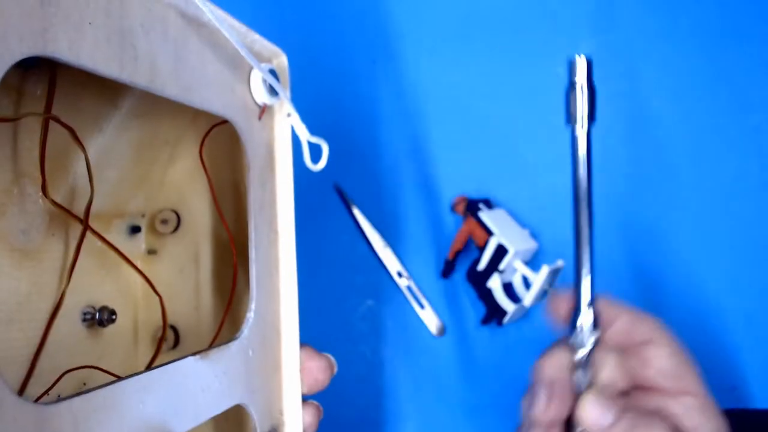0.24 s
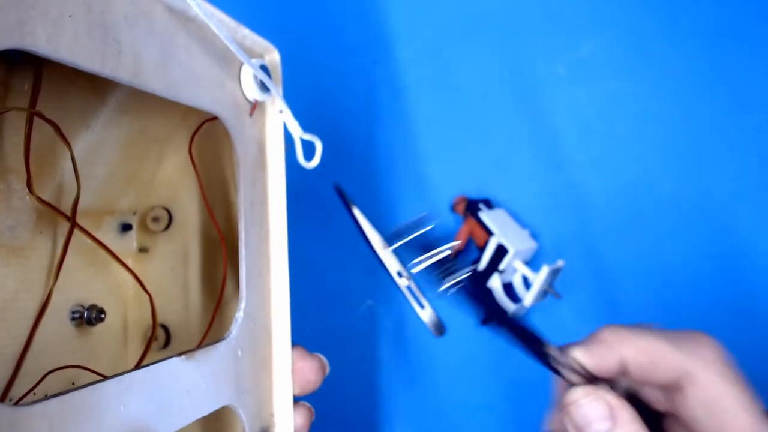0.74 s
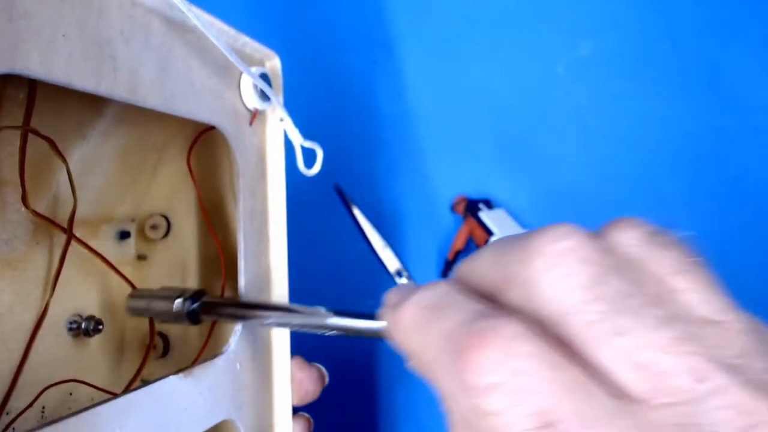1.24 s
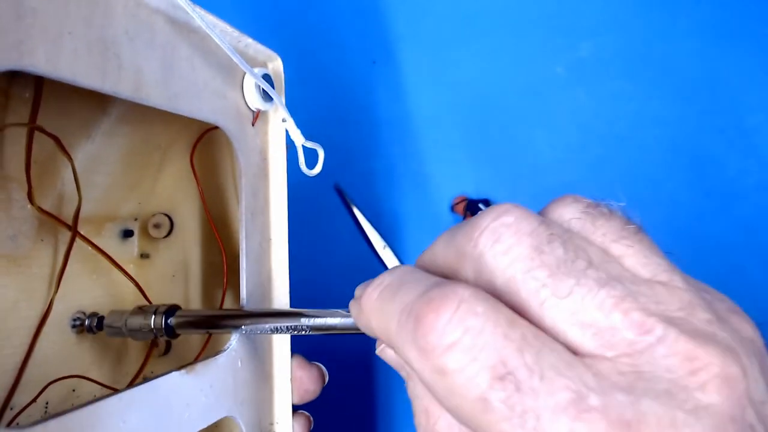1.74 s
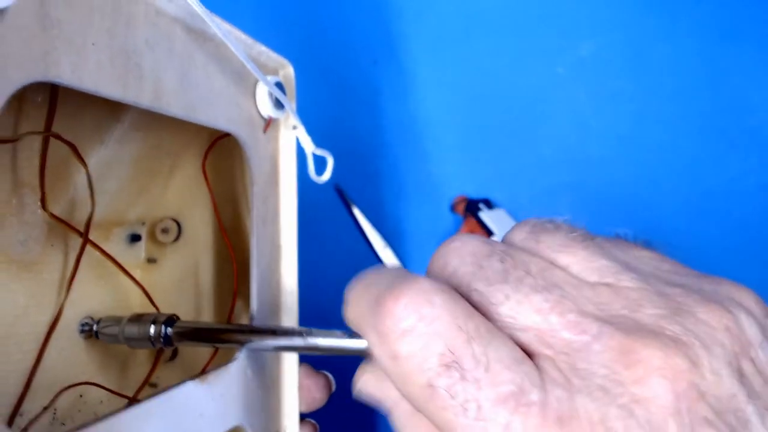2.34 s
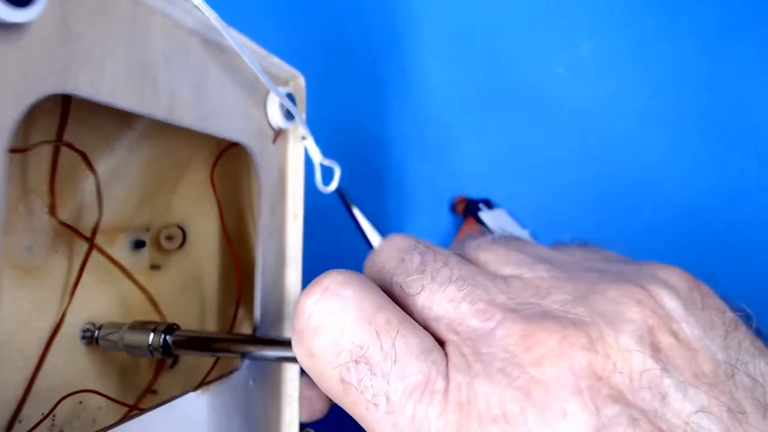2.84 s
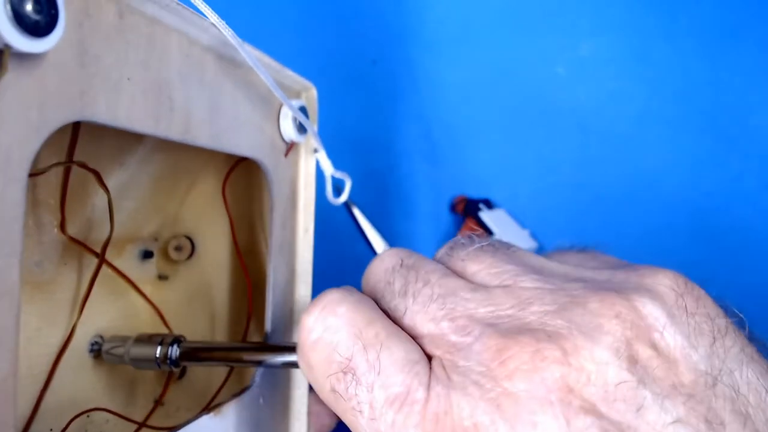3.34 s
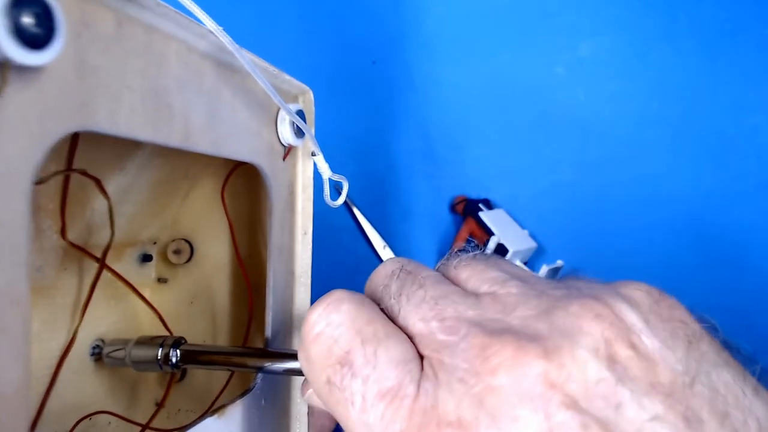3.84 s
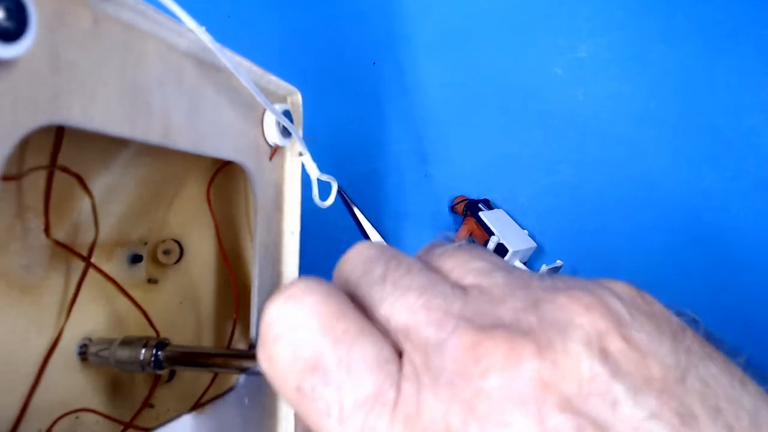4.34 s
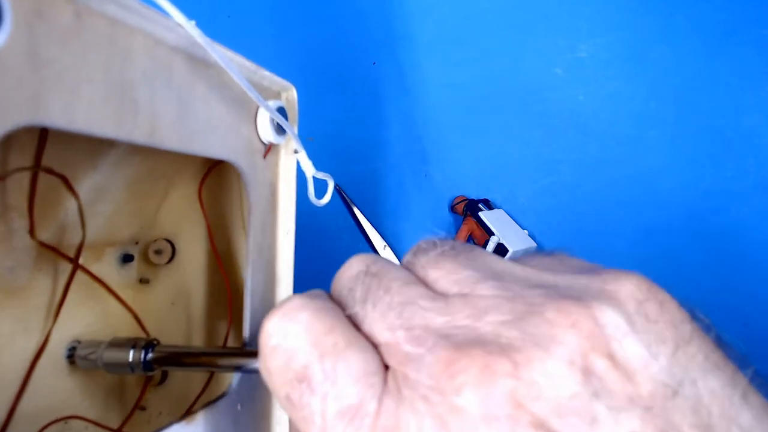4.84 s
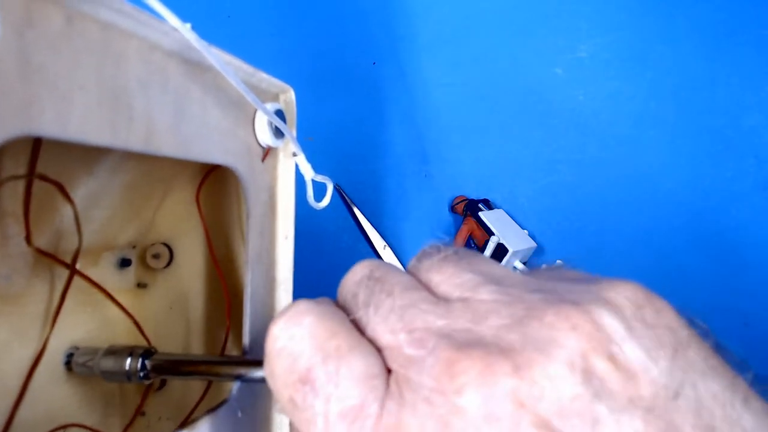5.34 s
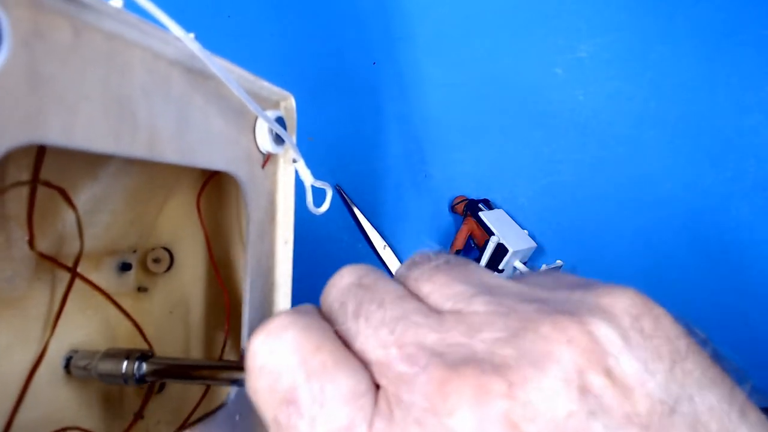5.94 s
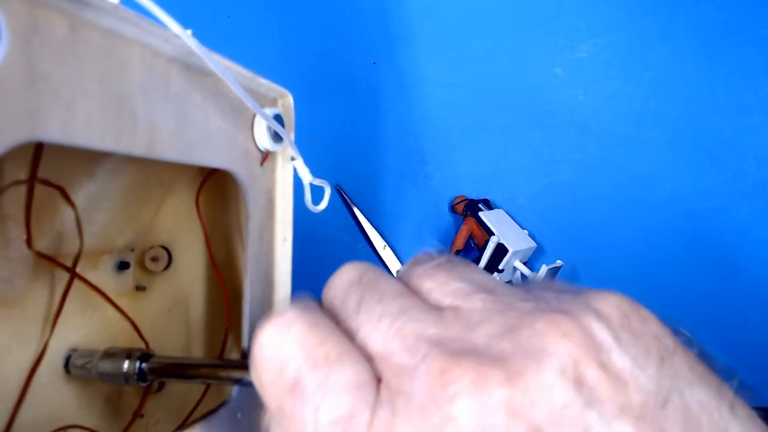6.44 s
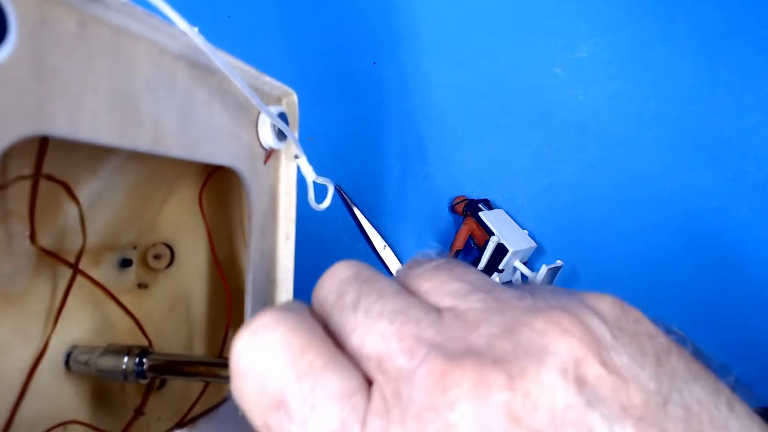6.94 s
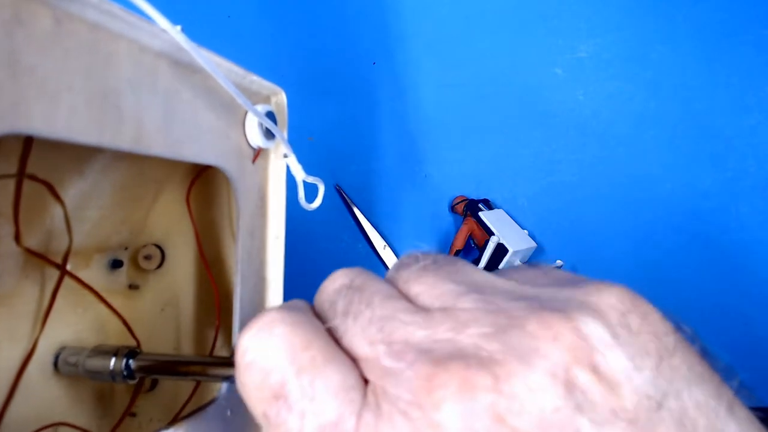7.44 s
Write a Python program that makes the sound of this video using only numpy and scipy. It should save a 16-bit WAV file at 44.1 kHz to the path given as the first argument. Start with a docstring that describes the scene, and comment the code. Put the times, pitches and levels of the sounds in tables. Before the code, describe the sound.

The first second is almost silent: faint camera hum, buzz and hiss, with a short dull click at about 0.16 s as a thin high whine sets in. A soft brush on wood comes near 0.9 s. At 1.03 and 1.25 s two loud, hollow knocks ring the thin wooden hull, the second hardest, followed by smaller taps and another strong knock at 1.73 s. From about 1.9 s the loose steel socket chatters on the nut, thickening from 2.7 s into a rapid, irregular run of dry woody clacks and metallic ticks, roughly fifteen to twenty a second at first, somewhat sparser after 5 s. Louder hits stand out around 4.1, 4.5, 5.3, 5.7, 6.35, 6.7 and 7.4 s. Light grinding and low hand rumble continue underneath to the end at about 7.7 s. Close, dry, small room.

```python
"""The loose socket of a steel nut driver knocks and chatters on a nut inside a thin wooden hull, turned by hand.
Each knock pushes decaying sine waves, the ringing wood, and adds noise bands for its thud, clack and steel tick.
Rubbing noise rings the same wood, noise grains grind on the nut, and the gripping hand rumbles in low noise bands.
Underneath, a nearby camera adds mains hum, buzz and whine made of sines, frame ticks and shaped hiss.
One short dull click, a push through two broad resonances, is heard near the start."""
import sys
import numpy as np
from scipy import signal
from scipy.fft import rfft, irfft
from scipy.io import wavfile
from scipy.ndimage import uniform_filter1d

SR = 44100
rng = np.random.default_rng(int(sys.argv[2]) if len(sys.argv) > 2 else 0)


def wav_out(sig):
    """Save sig, one row per channel (or a flat mono array), as 16-bit PCM at SR to the path in sys.argv[1]."""
    wavfile.write(sys.argv[1], SR, np.round(np.clip(np.atleast_2d(sig).T, -1, 1) * 32767).astype(np.int16))


N = 339570  # length [samples]

# Levels in the tables are starting points: mixing, filters and random drift shift them further.
# Camera hum: (frequency [Hz], relative level [dB])
HUM_TONES = [(59.2, 1), (94, -9), (118.4, -14), (179, -17.5), (274, -9)]
# Overall hum level: (time [s], level [dB])
HUM_LEVEL = [(0.0, -84), (0.13, -65), (0.45, -57), (1.31, -61.5), (1.76, -55.5), (2.14, -62.5),
             (2.7, -56.5), (4.35, -61), (4.8, -61.5), (7.7, -60.5)]
# Whine, buzz and ticks; they begin abruptly and later drop a step: (time [s], whine level [dB])
WHINE_LEVEL = [(0, -75.5), (.158, -88), (.168, -71.5), (3.0, -71), (4.18, -74), (4.24, -79.5), (7.7, -79.5)]
# Multiples of the clock: (multiple [count], level relative to the whine [dB])
BUZZ_TONES = [(5, -7), (6, -7.5), (7, -17.5), (8, -3.5), (9, -5.5), (11, -13.5), (12, -13.5), (14, -19),
              (15, -14.5), (22, -25)]
# Colour of the hiss: (frequency [Hz], relative level [dB])
HISS_COLOUR = [(25, 36.5), (45, 30), (80, 38.5), (160, 19.5), (280, 31), (430, 22.5), (990, 18), (1500, 11),
               (2000, 5), (3200, 7), (4600, 6), (7800, -1.5)]
# Low resonances of the held hull: (frequency [Hz], width of one filter pass [Hz], relative level [dB])
GRIP_BANDS = [(151.1, 13, 10.5), (171.4, 16, 8.5), (213.3, 15, 3.5), (123, 21, 3), (175, 84, 3.5)]
# The hand tightens on the hull as the turning starts: (time [s], rumble level [dB])
GRIP_LEVEL = [(0.0, -62), (0.3, -73), (0.62, -80), (1.0, -67), (1.76, -58.5), (2.25, -65), (2.7, -53),
              (3.2, -50), (7.7, -49)]
# Socket on nut: (time [s], body level [dB], upper modes relative to body [dB],
# metal tick relative to body [dB], chatter [0-1], lean to higher body modes [dB])
KNOCKS = [(0.025, -65, 2, 7, 0.55, 4), (0.361, -71.5, 14.5, 15, 0.27, 0), (0.4063, -75, 10, 11, .3, 0),
          (0.4509, -72, 9.5, 20, 0.37, 3), (0.6376, -75, 0, 13, .72, 9), (1.0317, -19, -11.5, -47, 0.16, 7),
          (1.2517, -11.5, -8.5, -16, 0.24, 0.5), (1.3143, -33.5, -27, -37, 0.22, -12),
          (1.4435, -32, -6, -18, 0.17, -0.5), (1.5559, -53.5, -9, -16, 0.44, -13),
          (1.614, -52, -10, -25, 0.25, -12), (1.729, -17, -14, -52, 0.35, -6),
          (1.7903, -38, -3.5, -27, 0.12, 3), (1.842, -41, -5.5, -21, 0.66, 7),
          (1.9387, -44, -1, -6.5, 1, -7), (1.9708, -28, -11, -3.5, 0.2, 4.5),
          (1.9772, -29, -7.5, -7, 0.2, 5), (2.1192, -45.5, -15, -30, 0.17, -4),
          (2.216, -53, -10, -19, 0.04, 0), (2.2745, -31.5, -22, -42, 0.23, 0.5),
          (2.317, -40, -7.5, -20, 0.35, 0.5), (2.3337, -42, 0, -20, .2, 3),
          (2.3973, -47.5, -5.5, -11, .38, 14), (2.4632, -33, -12, -12, .18, 4.5),
          (2.5424, -31.5, -1, -9, 0.51, 8), (2.6093, -31, -7.5, -32, 0.31, -2),
          (2.7181, -39, -12, -6, 0.07, 2), (2.7367, -39.5, -6.5, -16, 0.12, 2),
          (2.9046, -33, -8, -3, 0.28, 1), (2.9663, -24, -10.5, -17, 0.5, -3),
          (2.9872, -28.5, -12, -14, 0.62, 9), (3.0642, -45, -11, -14, 0.44, -2),
          (3.0945, -33, -12.5, -17, 0.34, -7), (3.1748, -46, -8, -11, 0.94, 3),
          (3.2769, -42.5, -2, -11.5, 0.42, 5), (3.3039, -41.5, -9, -20, 0.64, 3),
          (3.3391, -30.5, -8, -9, 0.27, 8), (3.3929, -35, -3.5, -17, 0.26, -6),
          (3.4204, -34, -2.5, -18, 0.05, 13), (3.4783, -34.5, -16, -38, 0.25, 3),
          (3.4985, -34, -8.5, -20, 0.22, 7), (3.5525, -47, -34, -22, .27, 10),
          (3.5765, -40, 1.5, -17, 0.36, 6), (3.6166, -39.5, -11, -19, 0.46, -2),
          (3.6503, -46.5, -2.5, -13, 0.3, 4), (3.6691, -40, -9, -11.5, 0.38, 1),
          (3.6856, -44, -7, -20, 0.5, -9), (3.7362, -37, -18, 7, 0.15, 11),
          (3.7454, -30, -7.5, -9, 0.42, 0), (3.814, -52, -9, -1, .54, 5),
          (3.8332, -40.5, 2.5, -6.5, 0.29, 5.5), (3.9831, -35.5, -17, -55, 0.24, 4),
          (4.0191, -43, -15, -29, 0.9, -3), (4.072, -43, -4.5, -6.5, 1, 7),
          (4.0955, -24.5, -5, -3, 0.34, 6.5), (4.186, -44.5, -20, -31, 0.28, -4),
          (4.2109, -48, -16, -29, .42, -6), (4.3968, -49.5, -7, -7, 0.2, -4.5),
          (4.412, -32.5, -4, -0.5, 0.26, 6), (4.4573, -29.5, -8, -6, 0.09, 1),
          (4.5043, -37, 1.5, 7, 0.38, 6), (4.5173, -21, -3.5, -15, 0.04, -9),
          (4.5222, -17.5, -4, -13, 0.26, 1.5), (4.5605, -50, 12, 3, 0.53, 4),
          (4.6038, -37, -5.5, -21, 0.35, 12), (4.6434, -57.5, 10.5, -4, 0.3, 3),
          (4.6873, -34.5, -8.5, -37, 0.12, 11), (4.7421, -49.5, -13, -36, 0.6, -1),
          (4.8014, -45, -3, -9.5, 0.83, -5), (4.834, -30.5, -1.5, 4.5, 0.11, 7),
          (4.8441, -28.5, -14, -19, 0, 0), (4.8692, -35.5, -16, -19, 0.26, 0),
          (4.9219, -45.5, -16, -30, 0.3, 4), (4.9866, -45.5, -9, -20, 0.6, 4),
          (5.0674, -52, -3, -20, 0.5, -1), (5.111, -43.5, -33, -37, 0.4, -10),
          (5.1787, -45, -2, -7, 0.77, 8), (5.2051, -32.5, -0.5, 2.5, 0.41, 3),
          (5.2876, -20.5, -11.5, -26, 0.21, 7), (5.362, -48, -22, -32, 0.1, 10),
          (5.3901, -52, 5.5, 2, 0.02, 5), (5.4316, -55, -3.5, -21, 0.04, -7),
          (5.5107, -46.5, 0.5, -4.5, 0.37, -1), (5.5529, -35.5, -6, -13, 0.14, 8),
          (5.5758, -35, -9, -10, 0.13, 10), (5.6637, -23, -5.5, -12.5, 0.42, 8),
          (5.7649, -56, 0, -32, 0.3, -2), (5.8119, -40.5, -3, -18.5, 0.57, 6),
          (5.8782, -45.5, -2.5, -11, 1, 8), (5.9077, -42, 8, 11, 0.16, -6),
          (5.9432, -40.5, -26, -21, 0.4, -3), (5.9822, -40, -21, -36, .72, -5),
          (6.0475, -39, -9.5, -21, 0.2, 4), (6.1079, -45, 0, -13, .13, 12), (6.173, -50, -10, -25, 0.4, -5),
          (6.2262, -39.5, -4, -7, 0.18, 13), (6.2401, -40.5, -6, -13.5, 0.83, 0),
          (6.2676, -30.5, 4.5, 2.5, 0.22, 9), (6.352, -23, -12, -33, 0.41, 10.5),
          (6.4645, -44.5, -0.5, -10, 0.16, 1), (6.5055, -54.5, 1, -16, .27, 1),
          (6.538, -33.5, -16, -37, 0.07, 5), (6.584, -53, 0, 4, 1, -10), (6.6153, -37, 0, 1.5, 0.1, 19),
          (6.6256, -44, 7, 8.5, 0.25, 4), (6.6461, -32, -1, -10, 0.52, 1),
          (6.6794, -24.5, -5.5, -5, 0.08, 2.5), (6.7154, -24.5, -10, -38, .38, 8),
          (6.7897, -38, 1, -13, 0.23, 4.5), (6.8208, -53, -2, -8, .44, 2.5), (6.9395, -55, -8, -22, .72, 2),
          (6.9766, -25.5, -18, -24, 0.82, -1), (7.0032, -33.5, 1, -2, 0.06, 5),
          (7.0354, -33, -5.5, -12, 0.39, -1), (7.1112, -35, -10.5, -14.5, 0.1, -7),
          (7.1451, -41, -5.5, -17, 0.4, -12), (7.1945, -41.5, -26, -30, 0.3, 7.5),
          (7.3788, -33.5, -1, -.5, 0.12, 5), (7.406, -32.5, -8, -4, 0.23, 4),
          (7.4129, -23, -10, -4, 0.12, 10), (7.4328, -31, -18, -31, 0.4, 10),
          (7.475, -46.5, 0.5, -6, 0.86, -18), (7.5166, -43, -1, -7.5, 0.48, -8),
          (7.5611, -31.5, -7.5, -14.5, 0.09, 19.5)]
# Clear modes of the hull, in three groups that a knock excites unevenly, then the clink of the socket.
# Each: (frequency [Hz], relative level [dB], usual time to fade by 60 dB [s])
LOW_MODES = [(319, -5.5, 0.093), (324.1, 5.5, 0.13), (386.2, -1.5, 0.14), (466.5, 0, 0.16),
             (484, -19.5, 0.061)]
BODY_MODES = [(562, -12, 0.19), (609, -7.5, 0.14), (654.7, -3, 0.12), (708.3, -0.5, 0.067),
              (739.5, -3, 0.061), (826, -11.5, 0.073), (889, -15.5, 0.08), (930, -9.5, 0.049)]
UPPER_MODES = [(1032, 2.5, 0.042), (1069, 1.5, 0.059), (1152, -4.5, 0.11), (1410, -2.5, 0.033),
               (1468, -6, 0.083), (1556, 1, 0.04), (1700, 5, 0.0073), (1774, -6.5, 0.067),
               (1903, -2.5, 0.038), (2094, -5, 0.064), (2315, -2.5, 0.038), (2790, -19, 0.077)]
SOCKET_MODES = [(3110, -1.5, .045), (3180, -10.5, .04), (3523, -2, 0.04), (3756, -7.5, 0.035)]
# Crowded modes: the hull jolting in the hand, a dry thud under the body modes,
# a clack under the upper modes, and the treble of the steel, heard as a burst of hiss.
# Each: (frequency [Hz], width of the first filter [Hz], relative level [dB], time to fade by 60 dB [s])
JOLT_BANDS = [(110, 56, -25, 0.073), (170, 60, -25, .06)]
THUD_BANDS = [(450, 336, -10.5, 0.2), (677, 188, -4.5, 0.13)]
CLACK_BANDS = [(1072, 350, -6, 0.073), (1694, 410, -9.5, 0.12), (2320, 510, -15.5, 0.11),
               (2737, 310, -20.5, 0.06)]
TICK_BANDS = [(3160, 580, -14.5, 0.091), (3980, 860, -21, 0.14), (5140, 1400, -18.5, 0.065),
              (6330, 1200, -18, 0.06), (7130, 370, -25, 0.028)]

WHINE_HZ, CLOCK_HZ, HISS_DB = 4111, 200.0, -74
FRAME_HZ, FRAME_START_S = 30.0, 0.187
CLICK_S, CLICK_DB = 0.1615, -36.5  # a short dull click
TOP_HZ = 7900  # the recorder's top cut

# Shank and fingers rub on the wood, the more so the thicker the knocks fall
RUB_REST_DB, RUB_PER_KNOCK_DB, RUB_SPREAD_S, RUB_LAG_S = -71.5, 6.5, 0.071, 0.022
BRUSH_S, BRUSH_LENGTH_S, BRUSH_DB = 0.88, 0.09, 16  # a hand brushes the hull
EARLY_DB = -9  # less rubbing before the middle of the brush
# Grinding level at mean rubbing, dB gained per dB of rubbing, and mean rubbing
GRIND_DB, GRIND_PER_RUB, RUB_MEAN_DB = -74, 0.54, -56.5

CHATTER_S = 0.021  # hold time at chatter 1
LEAN_HZ = 690  # modes above gain half the lean, those below lose half
TILT_HZ, TICK_TILT_HZ = 1720, 4300  # pivots of the two treble tilts
LOW_DB, LOW_PER_LEAN = -9.5, -0.062  # low modes lose as the knock leans upward
TILT_DB, TILT_PER_TICK = 4, 0.28  # upper tilt [dB per octave]: the more metal tick, the brighter
TICK_TILT_DB = -1.6  # [dB per octave]
# Changes per dB of body level above the usual knock: hard knocks favour the body
LOW_PER_BODY, TILT_PER_BODY, THUMP_PER_BODY, USUAL_DB = -0.2, -0.15, -0.4, -36


def undb(db):
    """Turn decibels into gain."""
    return 10 ** (np.asarray(db) / 20)


def unit(x):
    """Scale to an rms (average strength) of 1."""
    return x / np.sqrt(np.mean(x ** 2))


def curves(rows):
    """Draw straight lines between the table's points, one value per sample."""
    s, *columns = np.transpose(rows)
    return [np.interp(np.arange(N) / SR, s, c) for c in columns]


def band(x, hz, width):
    """Resonant band-pass filter with gain 1 at its centre."""
    return signal.lfilter(*signal.iirpeak(hz, hz / width, SR), x)


def mode(force, hz, t60):
    """A resonance that answers each push with a decaying sine."""
    r = np.exp(-np.log(1000) / (t60 * SR))
    w = 2 * np.pi * hz / SR
    return signal.lfilter([0, r * np.sin(w)], [1, -2 * r * np.cos(w), r * r], force)


def walk(rate):
    """Random drift: levels held for 1 / rate seconds and smoothed twice; spread near 1."""
    k = int(SR / rate)
    steps = np.repeat(rng.standard_normal(N // k + 1), k)
    return 0.68 * uniform_filter1d(uniform_filter1d(steps, k), k)[:N]


def camera():
    """Electronics: wavering hum, clock buzz, a tick at each frame, a whine and hiss."""
    (hum_db,), (whine_db,) = curves(HUM_LEVEL), curves(WHINE_LEVEL)
    t = np.arange(N) / SR
    hum = sum(undb(db + 3.0 * walk(6.6)) * np.sin(2 * np.pi * hz * t + 0.56 * walk(29))
              for hz, db in HUM_TONES)
    buzz = sum(undb(db) * np.sin(2 * np.pi * (k * CLOCK_HZ * t + rng.random())) for k, db in BUZZ_TONES)
    frames = np.zeros(N)
    frame_times = np.arange(FRAME_START_S, N / SR, 1 / FRAME_HZ)
    frames[(frame_times * SR).astype(int)] = 1
    ticks = undb(11.5) * mode(frames, 1450, 0.039)
    whine = np.sin(2 * np.pi * WHINE_HZ * t + 0.43 * walk(30))

    # Colour white noise by weighting its frequencies
    f = np.maximum(np.fft.rfftfreq(N, 1 / SR), 1)
    hz, db = np.transpose(HISS_COLOUR)
    colour = undb(np.interp(np.log(f), np.log(hz), db))
    hiss = irfft(rfft(rng.standard_normal(N)) * colour, N)
    hiss_gain = undb(HISS_DB + 1.9 * walk(4.7) + 1.3 * walk(23))
    tones = undb(hum_db) * hum + undb(whine_db) * (buzz + ticks + whine)
    return np.sqrt(2) * tones + hiss_gain * hiss


def click():
    """A very short push rings two broad resonances: a dull click with a trace of crackle."""
    t = np.arange(N) / SR - CLICK_S
    push = (t >= 0) * np.exp(-np.abs(t) / 0.00013)
    crack = (t >= 0) * np.exp(-np.abs(t) / 0.0015) * rng.standard_normal(N)
    return undb(CLICK_DB) * (8.3 * band(push, 430, 440) + 2.8 * band(push, 1400, 640) + 0.06 * crack)


def grip(level_db):
    """Trembling muscles shake the held hull in its lowest, unsteady resonances."""
    rumble = 0
    for hz, width, db in GRIP_BANDS:
        noise = band(band(rng.standard_normal(N), hz, width), hz, width)
        rumble = rumble + undb(db + 0.54 * walk(3.08)) * unit(noise)
    return undb(level_db) * unit(rumble)


def rubbing():
    """Level of the rubbing in dB: every knock adds a soft swell centred just after it."""
    t = np.arange(0, N, 64) / SR  # a coarse time grid is enough

    def swell(s, width):
        """A smooth bump centred at s seconds."""
        return np.exp(-((t - s) / width) ** 2)

    knock_times = np.transpose(KNOCKS)[0][:, None]
    busy = swell(knock_times + RUB_LAG_S, RUB_SPREAD_S).sum(axis=0)
    db = RUB_REST_DB + RUB_PER_KNOCK_DB * busy
    db = db + EARLY_DB * (t < BRUSH_S) + BRUSH_DB * swell(BRUSH_S, BRUSH_LENGTH_S)
    return np.interp(np.arange(N) / SR, t, db)


def scrape(level_db):
    """The socket grinds on the flats of the nut: dense uneven grains of noise."""
    grains = undb(7.0 * walk(120)) * rng.standard_normal(N)
    grind = band(grains, 2000, 830) + 0.19 * band(grains, 3300, 900) + 0.88 * band(grains, 1300, 700)
    return undb(level_db) * unit(grind)


def place(shapes):
    """Lay one shape per knock on the time line."""
    out = np.zeros(N + shapes.shape[1])
    for row, shape in zip(KNOCKS, shapes):
        start = int(row[0] * SR)
        out[start:start + len(shape)] += shape
    return out[:N]


def bounce(chatter, t, rise):
    """How hard the socket rattles after the first touch: a quick rise, a hold and a drop."""
    hold = CHATTER_S * np.clip(chatter, 0.03, 1.5)[:, None]
    return (1 - np.exp(-t / (rise + 0.08 * hold))) * np.exp(-(t / hold) ** 2)


def contact(chatter, first=5.1):
    """Force of each knock: one firm push, then sparse small bounces, scaled to energy 1."""
    chance = rng.standard_normal((len(KNOCKS), 2048))
    # Cubing leaves most bounces tiny and a few strong
    force = 0.027 * chance ** 3 * bounce(chatter, np.arange(2048) / SR, 0.00026)
    force[:, 0] = -first
    return force / np.sqrt(np.sum(force ** 2, axis=1, keepdims=True))


def crowd(bands, share_db, chatter, rise):
    """Modes too crowded to tell apart: gritty noise bands that follow the chatter and ring out briefly."""
    shape = bounce(chatter, np.arange(2048) / SR, rise)
    out = 0
    for hz, width, db, t60 in bands:
        swell = place(undb(share_db(hz))[:, None] * shape)
        keep = np.exp(-2 * np.log(1000) / (t60 * SR))  # power kept from sample to sample
        power = signal.lfilter([1 - keep], [1, -keep], swell ** 2) + 0.45 * swell ** 2
        grit = np.sqrt(power) * undb(db + 1.0 * walk(250)) * rng.standard_normal(N)
        out = out + band(band(grit, hz, width), hz, 2.19 * width) * np.sqrt(SR / width)
    return out


def upper_tilt(body_db, tick_db):
    """Treble tilt of each knock in dB per octave."""
    return TILT_DB + TILT_PER_TICK * tick_db + TILT_PER_BODY * (body_db - USUAL_DB)


def steel():
    """The noisy part of each knock: jolt and thud of the wood, clack of the contact, bright tick of the steel."""
    _, body_db, upper_db, tick_db, chatter, _ = np.transpose(KNOCKS)
    tilt_db = upper_tilt(body_db, tick_db)

    def jolt_share(hz):
        return body_db + THUMP_PER_BODY * (body_db - USUAL_DB)

    def clack_share(hz):
        return body_db + upper_db + tilt_db * np.log2(hz / TILT_HZ)

    def tick_share(hz):
        return body_db + tick_db + TICK_TILT_DB * np.log2(hz / TICK_TILT_HZ)

    jolt = crowd(JOLT_BANDS, jolt_share, chatter, 0.0017)
    thud = crowd(THUD_BANDS, lambda hz: body_db, chatter, 0.00059)
    clack = crowd(CLACK_BANDS, clack_share, chatter, 0.001)
    tick = crowd(TICK_BANDS, tick_share, chatter, 0.00057)
    return jolt + thud + clack + tick


def hull(rub):
    """Knocks and rubbing ring the same modes; the shifting grip detunes, damps and weights them for each knock."""
    _, body_db, upper_db, tick_db, chatter, lean_db = np.transpose(KNOCKS)
    tilt_db = upper_tilt(body_db, tick_db)
    low_db = LOW_DB + LOW_PER_LEAN * lean_db + LOW_PER_BODY * (body_db - USUAL_DB)
    chance = rng.standard_normal((len(KNOCKS), 32, 4), dtype=np.float32)[..., None]
    # (modes, rubbing level [dB], share of each knock relative to its body level [dB])
    groups = [(LOW_MODES, -36, lambda hz: low_db),
              (BODY_MODES, -34, lambda hz: np.sign(hz - LEAN_HZ) * lean_db / 2),
              (UPPER_MODES, -50, lambda hz: upper_db - 3.5 + tilt_db * np.log2(hz / TILT_HZ)),
              (SOCKET_MODES, -70, lambda hz: tick_db - 9.5 + TICK_TILT_DB * np.log2(hz / TICK_TILT_HZ))]
    rings, rubbed, k = np.zeros((len(KNOCKS), 4096)), 0, 0
    for modes, rub_db, share_db in groups:
        for hz, db, t60 in modes:
            t = np.arange(min(int(t60 * SR), 4096), dtype=np.float32) / SR
            weight, detune, damp, late = chance[:, k].transpose(1, 0, 2)
            sign = (-1) ** k  # neighbouring modes push opposite ways
            gain = undb((body_db + share_db(hz) + db)[:, None] + 2.4 * weight)
            fade = np.exp(-np.log(1000) * t / (t60 * np.exp(0.18 * damp)))
            # Bending waves need a moment to fill the hull
            fill = 1 - np.exp(-t * hz / 0.52)
            wave = np.sin(2 * np.pi * hz * (1 + 0.011 * detune) * t + 0.83 * late)
            rings[:, :len(t)] += sign * gain * fill * fade * wave
            rubbed = rubbed + sign * undb(db + rub_db) * mode(rub, hz, t60)
            k += 1
    wood = place(signal.fftconvolve(rings, contact(chatter), axes=1)) + rubbed
    # Thin wood gives off little sound below its lowest modes
    return signal.sosfilt(signal.butter(6, 275, "high", fs=SR, output="sos"), wood)


def room(wood):
    """Near bench and walls: a short dull tail of fading noise, convolved with the sound."""
    t = np.arange(int(0.25 * SR)) / SR
    noise = band(rng.standard_normal(len(t)), 700, 3200)
    tail = noise * np.exp(-np.log(1000) * t / 0.081) * np.minimum(t / 0.0029, 1)
    return undb(-19.5) * signal.fftconvolve(wood, tail / np.sqrt(np.sum(tail ** 2)))[:N]


def scene():
    """Add all sources at one microphone port and copy the sum to two channels."""
    rub_db, (grip_db,) = rubbing(), curves(GRIP_LEVEL)
    rub = undb(rub_db + 8.5 * walk(45)) * rng.standard_normal(N)
    grind_db = GRIND_DB + GRIND_PER_RUB * (rub_db - RUB_MEAN_DB)
    wood = hull(rub) + steel() + scrape(grind_db)
    return np.tile(wood + room(wood) + grip(grip_db) + camera() + click(), (2, 1))


def record(dry):
    """Round off positive peaks, turn the left channel down slightly while the sound is loud, and cut the top."""
    top = 0.45  # ceiling of the positive peaks
    rounded = np.where(dry > 0, dry / (1 + (np.maximum(dry, 0) / top) ** 4) ** 0.25, dry)
    loud = uniform_filter1d(np.abs(dry[0]), 1500)
    channel_gain = np.array([1 / (1 + 11 * loud ** 2), np.ones(N)])
    top_cut = signal.ellip(10, 0.3, 60, TOP_HZ, fs=SR, output="sos")
    cut = signal.sosfilt(top_cut, rounded * channel_gain)
    shared_noise = undb(-102) * rng.standard_normal(N)
    channel_noise = undb(-119) * rng.standard_normal(dry.shape)
    return cut + shared_noise + channel_noise


dry = scene()
out = record(dry)
wav_out(out)
```